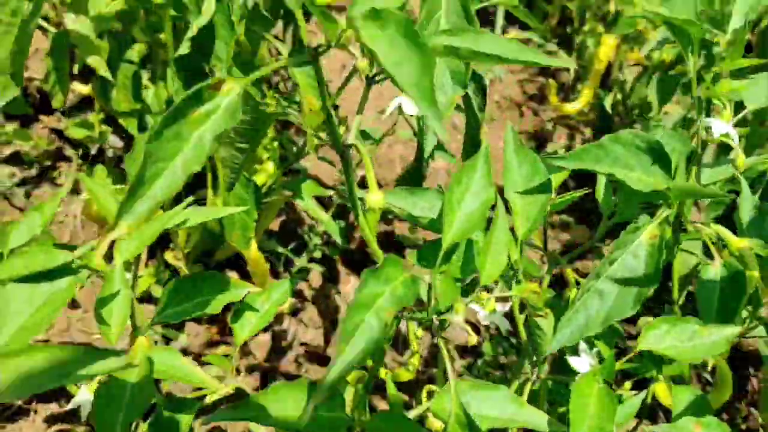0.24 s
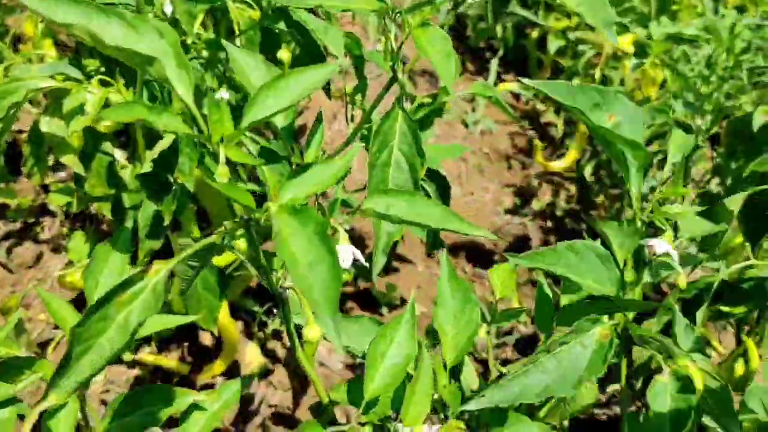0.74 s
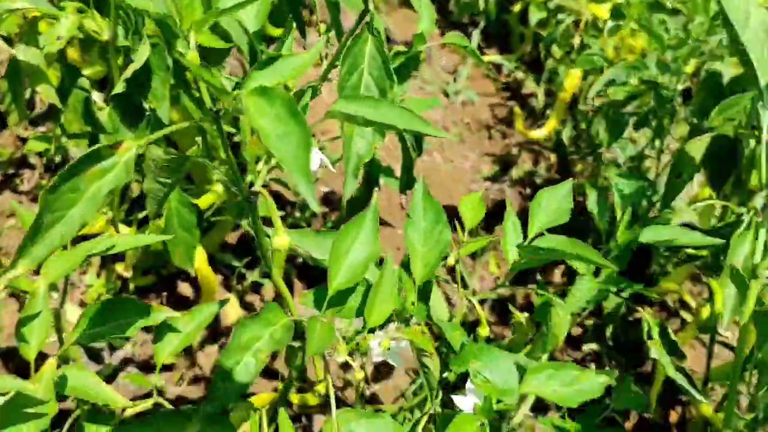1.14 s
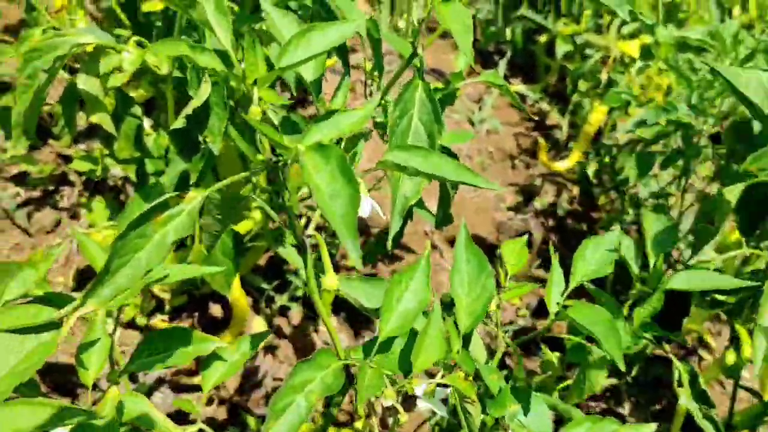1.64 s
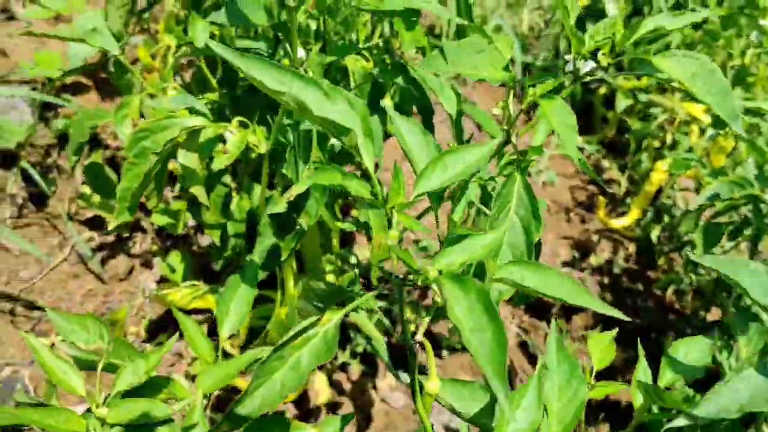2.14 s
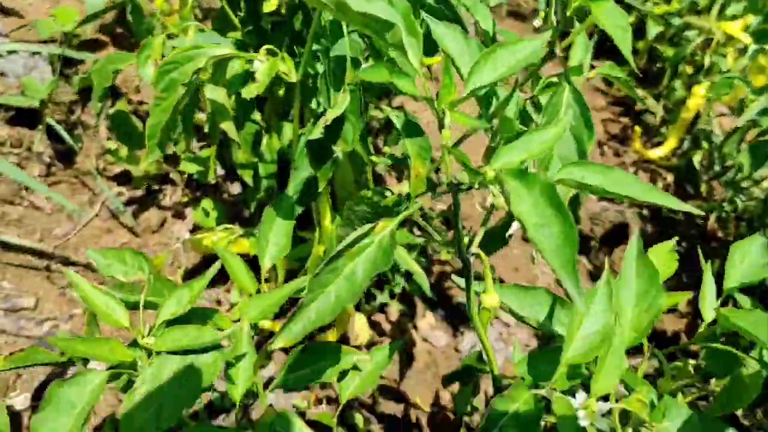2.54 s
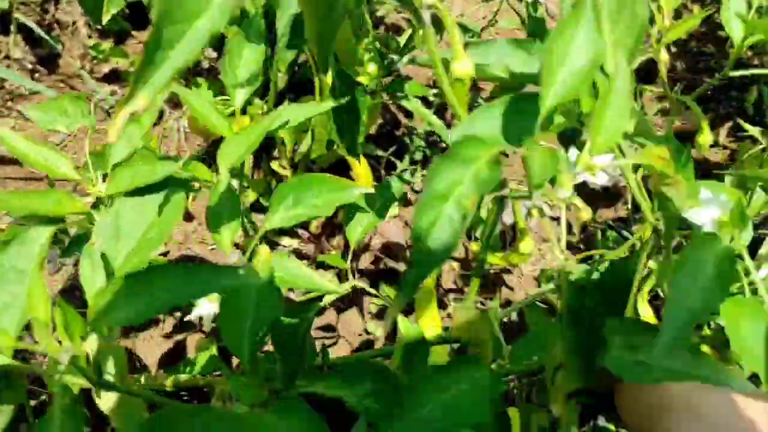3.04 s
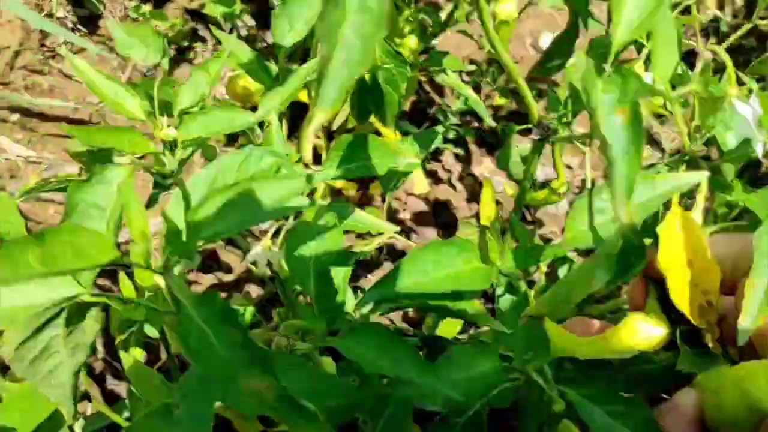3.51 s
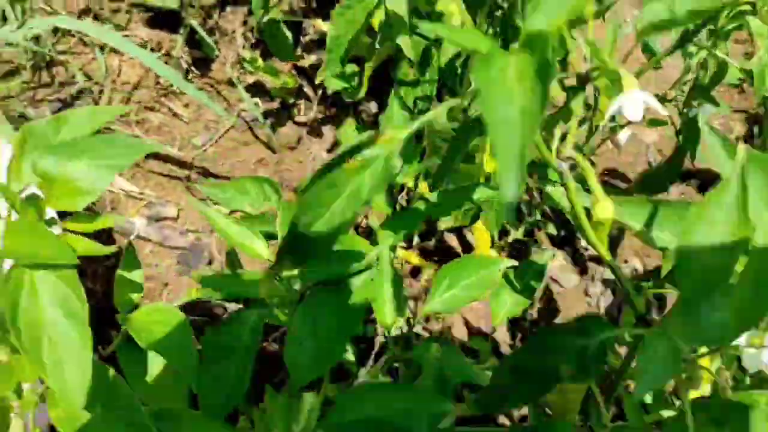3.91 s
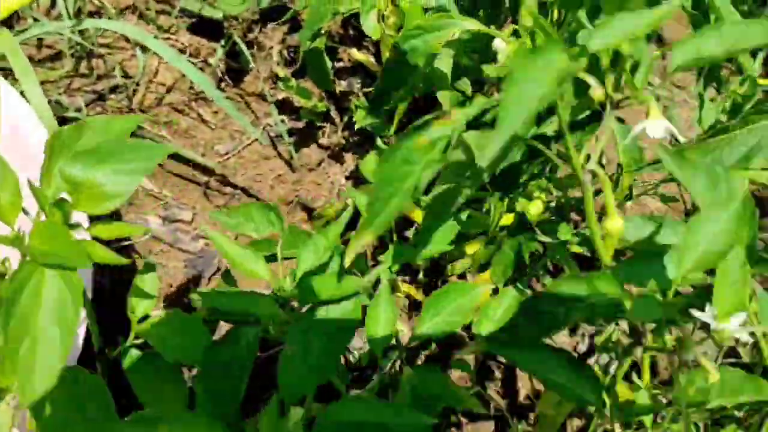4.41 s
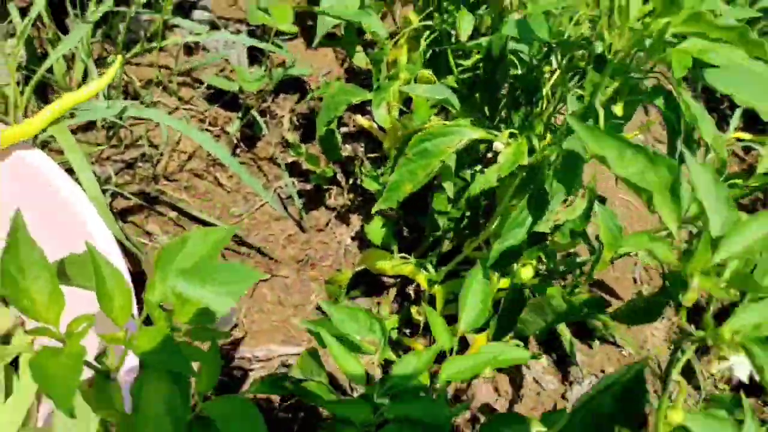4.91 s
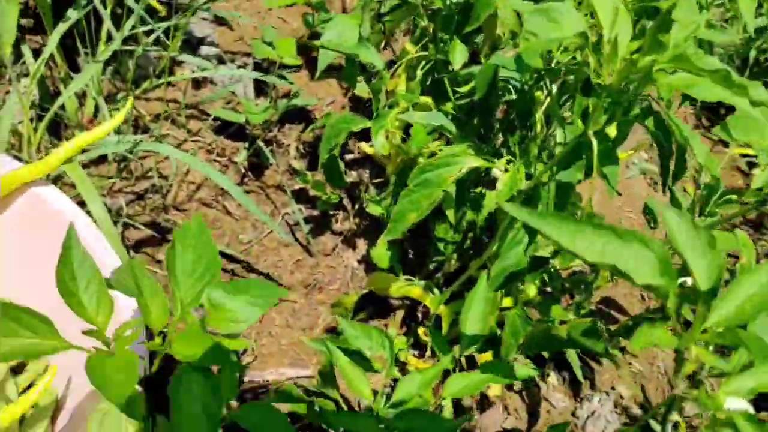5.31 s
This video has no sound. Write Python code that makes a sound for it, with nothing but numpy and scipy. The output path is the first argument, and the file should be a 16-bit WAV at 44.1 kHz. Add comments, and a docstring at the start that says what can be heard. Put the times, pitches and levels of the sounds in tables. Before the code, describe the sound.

Someone walks closer through leafy pepper plants: dull earthy steps, rustling foliage, sharp little twig snaps, then a light rattling knock.

```python
"""Footsteps among pepper plants

Eight footsteps on dry garden soil come closer: dull heel thud, rolling sole, crunch of crumbs.
Leaves brush the legs, cloth shuffles, stalks snap; a light knock follows the last step. Faint air, far hum.
Thuds, stalks and knock are swept or struck resonances; crumbs and leaves are random grains and pings;
the softer layers are shaped noise. Two microphone ports hear it all.
"""
import sys
import numpy as np
from scipy import signal
from scipy.fft import rfft, irfft, next_fast_len
from scipy.io import wavfile

SR = 44100
rng = np.random.default_rng(int(sys.argv[2]) if len(sys.argv) > 2 else 0)


def wav_out(sig):
    """Save sig, one row per channel (or a flat mono array), as 16-bit PCM at SR to the path in sys.argv[1]."""
    wavfile.write(sys.argv[1], SR, np.round(np.clip(np.atleast_2d(sig).T, -1, 1) * 32767).astype(np.int16))


N = 245195
TIME = np.arange(N) / SR

# All levels are relative. left-right/dB > 0: louder on the left.
# outdoor air spectrum [f/Hz, level/dB per Hz]
AIR_SPECTRUM = [(20, -2.5), (48, -1), (80, -7.5), (150, -12.5), (340, -13), (520, -18.5), (800, -14),
                (1500, -21.5), (4000, -20), (8000, -25), (15000, -50)]
# trouser cloth as the legs swing [t/s, level/dB]
CLOTH_LEVEL = [(0, -71), (.04, -64.5), (.2, -69.5), (.4, -82), (.9, -76), (1.3, -60), (1.55, -68.5),
               (1.9, -65.5), (2.15, -68), (2.45, -66), (2.7, -69.5), (3.1, -64.5), (3.7, -65), (4.2, -80),
               (4.75, -67), (5.0, -71), (5.4, -70.5), (5.55, -65)]
# cloth spectrum [f/Hz, level/dB per Hz]
CLOTH_SPECTRUM = [(50, -7), (110, -1), (190, 1.5), (280, -4.5), (390, -2.5), (540, -15), (900, -15.5),
                  (2000, -27), (5000, -46)]
# stirring foliage [t/s, level/dB]
FOLIAGE_LEVEL = [(0, -63), (.4, -66), (.56, -66.5), (.8, -65.5), (1.5, -64), (1.9, -67.5), (2.4, -67),
                 (3.0, -56), (3.6, -71), (3.86, -60.5), (4.15, -57), (4.36, -73), (4.9, -61), (5.1, -72.5),
                 (5.4, -71), (5.55, -67)]
FOLIAGE_PAN_DB = -2
# plants sweeping along the leg [loudest t/s, level/dB, build-up/s, settling/s, left-right/dB]
PLANT_SWEEPS = [(.225, -55.5, 0.05, 0.095, -5), (.955, -58, 0.057, 0.19, -3.5),
                (1.11, -57.5, 0.072, 0.15, 1), (1.96, -48.5, 0.0091, 0.073, 0),
                (2.13, -55, 0.057, 0.13, -3.5), (2.495, -59, 0.021, 0.022, -15),
                (2.608, -52, 0.12, 0.1, -3), (3.195, -53, 0.099, 0.11, -2), (3.425, -49, 0.1, 0.3, -4),
                (3.735, -54, 0.028, 0.087, -1.5), (4.01, -62, 0.0204, 0.069, 8),
                (4.25, -55.5, 0.017, 0.063, -4.5), (4.475, -45.5, 0.064, 0.044, -2.5),
                (4.576, -47.5, 0.043, 0.093, -5.5), (4.785, -52, 0.1, 0.03, -3),
                (5.23, -60.5, 0.063, 0.16, -4), (5.55, -55.5, 0.065, 0.045, -2)]
# leaf rustle spectrum [f/Hz, level/dB per Hz]
LEAF_SPECTRUM = [(200, 7.5), (700, -1.5), (1450, 0), (2400, 4), (5000, -0.5), (7500, 3), (10000, -6),
                 (13500, -2), (16000, -14)]
# leaf edges scraping past [t/s, length/s, level/dB, left-right/dB]
LEAF_SCRAPES = [(1.164, 0.014, -59.5, -19), (1.946, 0.055, -61.5, -9), (2.597, .03, -59.5, -4),
                (3.172, 0.029, -57, 0), (3.359, 0.022, -53, -11), (3.412, 0.058, -54, -5),
                (3.7, 0.056, -61.5, -5), (4.433, 0.022, -54, -2), (4.565, 0.031, -53, -3)]
# light knock, touch by touch [t/s, tick level/dB, hollow body level/dB]
KNOCK_TOUCHES = [(5.2811, -41, -66), (5.2856, -58, -58), (5.2898, -56, -47.5), (5.3062, -49, -44),
                 (5.326, -56, -70), (5.3316, -52.5, -49.5)]
# hard shell of the knocked thing [f/Hz, level/dB, t60/s]
SHELL_MODES = [(1410, -4, .012), (1720, -1.5, 0.016), (2500, -5.5, .022), (2810, -4, .018),
               (3840, -9, .025), (4350, -7, .02)]
# its hollow body [f/Hz, level/dB, t60/s]
BODY_MODES = [(390, 1, 0.037), (506, -3, 0.038), (830, -4, .025)]
# scuff of each touch [f/Hz, level/dB per Hz]
SCUFF_SPECTRUM = [(200, -32), (800, -4), (1300, -1), (1700, -4), (2400, 0), (3300, -6.5), (5500, -11),
                  (15000, -18)]
# stalks and dry leaves snapping [t/s, level/dB, left-right/dB, woody body level/dB, tear build-up/s]
SNAPS = [(0.238, -34.5, -18, -21, 0.0011), (1.061, -29.5, -13.5, -15, 0.0013),
         (1.591, -45.5, -7, -2.5, 0.00174), (1.9367, 0, -7.5, -19, 0.00082), (1.939, -8, -1, -16.5, 0.0013),
         (1.969, -25.5, -14, -26, 0.0014), (2.1347, -29.5, -6, -16, 0.0011),
         (2.567, -29.5, -9, -15, 0.0016), (2.614, -35, -12, -6.5, 0.0014), (2.737, -29, -3, -28, 0.0014),
         (3.196, -20, -6.5, -37, 0.002), (3.2849, -12, -7.5, -45, 0.001), (3.3228, -22, 5, -22, 0.001),
         (3.3487, -12, -6, -16.5, 0.0011), (3.351, -17.5, -5, -12, 0.0011),
         (3.374, -18.5, -13, -24, 0.00095), (3.3804, -24, -17, -19, 0.0013),
         (3.583, -35.5, -12, -25, 0.0011), (3.7368, -26.5, -8, -35, 0.0026),
         (3.84, -31.5, -16.5, -7.5, 0.00086), (3.8893, -21.5, 13, -24, 0.0011),
         (4.341, -23, -13.5, -41, 0.00096), (4.345, -29, -18, -26, 0.00076),
         (4.3751, -12, -15, -37, 0.00088), (4.433, -33, 0, -35, 0.001), (4.463, -32, 8, -16, 0.001),
         (4.566, -21, -3, -40, 0.0013), (4.588, -31, -5, -35, 0.0013), (4.5965, -31, -8, -37, 0.001),
         (4.681, -40.5, -10, 3, 0.00144), (5.545, -30.5, -12, -24, 0.0015)]
BRITTLE_S = 0.00095  # slower tears start with a weaker crack
# cracking fibre [f/Hz, level/dB, t60/s]
FIBRE_MODES = [(6940, 4, 0.0019), (8660, 4.5, 0.00035), (13100, -15.5, 0.012), (14600, -10.5, 0.0026)]
# tearing fibres [f/Hz, level/dB per Hz]
TEAR_SPECTRUM = [(1000, -7), (3500, 2), (5000, -5.5), (6500, 5.5), (8000, 8), (10000, 12), (15000, -21)]
# stalk ringing after a snap [f/Hz, level/dB, t60/s]
STALK_MODES = [(540, -16.5, 0.012), (910, -22, 0.027), (1600, -15.5, 0.018), (2246, -9, 0.011),
               (2635, -9.5, 0.0083), (3217, -16, 0.024), (5280, -14, 0.016)]
# clods giving way as the foot comes to a stand [t/s, level/dB]
CLODS = [(4.441, -61), (4.555, -57.5), (4.576, -51.5), (4.635, -54), (4.669, -58.5)]
# clod spectrum [f/Hz, level/dB per Hz]
CLOD_SPECTRUM = [(80, -11), (200, -12), (360, 4.5), (520, -11), (800, -1), (1200, -18), (2500, -13),
                 (6000, -29)]
# footsteps [t/s, thud level/dB, crunch level/dB, crunch left-right/dB, toe share of crunch/dB,
#   thud shares/dB: heel, heel knock, sole, deep, ground ring;
#   heel to ring/s, ring hold/s, ring release/s, ring f/Hz, ring sag/(Hz/s) (< 0 rises), ring judder (0-1)]
STEPS = [(0.6111, -39, -58.5, -1, -10.5, -1.5, -6.5, -6, 1, -10.5, 0.029, 0.026, 0.029, 221.4, -67, 0.14),
         (1.138, -38, -54, -2, -4.5, -18, -10, 4.5, 4, -6, 0.042, 0.07, 0.0072, 227, 0, .1),
         (1.6744, -33, -49.5, 0.5, -6, -1, -8, -7, 3, -7.5, .022, 0.027, 0.025, 230.7, 105, 0.22),
         (2.213, -29, -48, 1, -9.5, -11, -6.5, -5.5, 3, -7.5, 0.019, 0.039, 0.031, 232.3, 65, 0.23),
         (2.762, -34.5, -46.5, -0.5, -9.5, 0, 0, 1, 3, -6.5, 0.022, 0.022, 0.027, 242, 300, 0.13),
         (3.3213, -30, -48.5, 3.5, -16, 3.5, -2, -5, 0.5, -4.5, 0.023, 0.027, 0.014, 239, 200, 0.11),
         (3.8884, -24, -46.5, -0.5, -8, 0, -12, -6.5, -3, -12, .022, 0.021, 0.024, 237.4, 408, 0.18),
         (4.461, -21.5, -45, 1, -8.5, 1, 1.5, -4, -11, -14.5, 0.029, 0.011, 0.038, 244.5, 200, .1)]
# crumbs breaking [f/Hz, level/dB per Hz]
CRUMB_SPECTRUM = [(200, -5), (600, 9), (1200, 2), (2200, 1), (4000, -0.5), (6000, 0.5), (9000, 1.5),
                  (15000, -29)]
# crumbs: heel presses, holds, lets go; toe pushes off; loose crumbs trickle on
HEEL_ATTACK_S, HEEL_HOLD_S, HEEL_RELEASE_S = 0.00069, 0.029, 0.035
TOE_AFTER_S, TOE_WIDTH_S = 0.12, 0.036
TRICKLE_DB, TRICKLE_S = -14.5, 0.29
# heel on packed soil [f/Hz, level/dB, t60/s]
HEEL_KNOCK_MODES = [(368, -1.5, 0.15), (488, -2, 0.063), (579, -3, 0.031), (608, 8, 0.025),
                    (674, -7, 0.076)]
# rolling sole bumping on lumps [t/s, level/dB, f/Hz]
SOLE_BUMPS = [(0.6079, -42, 210), (0.627, -41, 230), (1.1542, -41, 201), (1.1685, -30.5, 103),
              (1.690, -28.5, 160), (2.2299, -35, 210), (2.780, -31, 261), (3.928, -40, 190),
              (4.497, -33, 200)]
# weaker ground modes around the main ring [f/Hz, level/dB, t60/s]
GROUND_MODES = [(129, -7.5, 0.12), (182.6, -17.5, 0.23), (308, -23.5, 0.52), (376, -15, 0.066),
                (644, -38, .10)]
# sole pressing into soil [f/Hz, level/dB per Hz]
SOLE_SPECTRUM = [(40, -33.5), (120, -2), (240, -1.5), (370, -2), (470, -14.5), (650, -39), (950, -27),
                 (2000, -51)]
# body weight shaking the deeper ground [f/Hz, level/dB per Hz]
DEEP_SPECTRUM = [(20, -26.5), (55, -12), (120, -3), (160, -4), (230, -11.5), (500, -36.5)]
# microphone ports, each with its own treble resonance [f/Hz, left level/dB, right level/dB]
PORTS = [(60, 5, -0.5), (450, 3, -2), (1150, 4.5, 0.5), (2530, -3.5, 0.5), (4460, -2, 2.5),
         (6700, -3.5, 7.5), (7350, 3.5, 11), (8000, -2, 8.5), (8540, 11, -0.5), (9490, 4, -15.5),
         (10470, -14.5, -13), (12600, -4, -9.5), (15100, -13, -11.5), (16400, -14, -13.5)]
PORT_LAG_S, BASS_LAG_S = 0.00032, 0.00036
CUTOFF_HZ = 16400


def from_db(db):
    """Decibels to gain."""
    return 10 ** (np.asarray(db) / 20)


def rms_one(x):
    """Scale to an rms of 1."""
    return x / np.sqrt(np.mean(x ** 2) + 1e-20)


def butter(x, order, edge_hz, kind="low"):
    """Butterworth low-pass or high-pass."""
    return signal.sosfilt(signal.butter(order, edge_hz, kind, fs=SR, output="sos"), x)


def soften(x, edge_hz):
    """A soft contact carries little treble: low-pass."""
    return butter(x, 2, edge_hz)


def colour(x, spectrum):
    """Causal minimum-phase filter through (f/Hz, level/dB) points, by folding the cepstrum."""
    size = next_fast_len(N + SR // 10, True)
    size += size % 2
    hz, db = np.transpose(spectrum)
    grid_hz = np.maximum(np.arange(size // 2 + 1) * SR / size, 1)
    gain = from_db(np.interp(np.log(grid_hz), np.log(hz), db))
    cepstrum = irfft(np.log(gain))
    cepstrum[1:size // 2] *= 2
    cepstrum[size // 2 + 1:] = 0
    response = np.exp(rfft(cepstrum))
    return irfft(rfft(x, size) * response)[..., :N]


def coloured_noise(spectrum):
    """Shaped noise with an rms of 1."""
    return rms_one(colour(rng.standard_normal(N), spectrum))


def drift(per_s):
    """Slow random curve, rms 1, with per_s knots a second."""
    knots = rng.standard_normal(4096)
    return rms_one(np.interp(TIME * per_s, np.arange(len(knots)), knots))


def panned(x, pan_db):
    """Make the left channel pan_db louder than the right."""
    return x * from_db([[pan_db / 2], [-pan_db / 2]])


def from_right(x, lag_s=PORT_LAG_S):
    """A sound from the right reaches the left port later."""
    return np.array([np.interp(TIME - lag_s, TIME, x), x])


def clicks(times, heights):
    """One click of the given height at each time."""
    out = np.zeros(N)
    out[np.clip(np.round(times * SR).astype(int), 0, N - 1)] = heights
    return out


def ring(push, hz, t60):
    """Two-pole resonator: a unit click sets a decaying sine of height 1 ringing."""
    r = np.exp(-np.log(1000) / (t60 * SR))
    w = 2 * np.pi * hz / SR
    return signal.lfilter([0, np.sin(w)], [1, -2 * r * np.cos(w), r * r], push + 1e-18)


def struck(modes, times, level_db, vary_db):
    """Each blow rings each mode with its own strength; neighbouring modes start in opposite directions."""
    out = np.zeros(N)
    for k, (hz, db, t60) in enumerate(modes):
        blow_db = level_db + db + vary_db * rng.standard_normal(len(times))
        out += (-1) ** k * ring(clicks(times, from_db(blow_db)), hz, t60)
    return out


def swell(start, rise_s):
    """Envelope that reaches 1 after rise_s and dies away."""
    age = np.maximum(TIME - start, 0) / rise_s
    return age * np.exp(1 - np.minimum(age, 50))


def bursts(spectrum, times, level_db, rise_s):
    """Countless tiny contacts, as shaped noise that swells and dies away after each time."""
    envelope = sum(from_db(db) * swell(t, rise) for t, db, rise in np.broadcast(times, level_db, rise_s))
    return envelope * coloured_noise(spectrum)


def fracture_sizes(spread_db):
    """Uneven sizes with an exponential spread in dB."""
    return from_db(spread_db * np.minimum(rng.exponential(1, N), 4))


def grains(per_s, spread_db, clump_db, alike_below_hz):
    """Tiny fractures in clumps; lows reach both ports alike but for a lag, highs differ."""
    sizes = fracture_sizes(spread_db) * from_db(clump_db * drift(140))
    pops = (rng.random(N) < per_s / SR) * sizes * rng.standard_normal((3, N))
    lows = from_right(soften(pops[0] + 1e-18, alike_below_hz))
    highs = butter(pops[1:] + 1e-18, 2, alike_below_hz, "high")
    return rms_one(lows + highs)


def pings(per_s, low_hz, high_hz, cycles, spread_db, count=20):
    """Random tiny fractures, each ringing at one of count pitches, down 60 dB after the given cycles."""
    sizes = fracture_sizes(spread_db) * rng.choice([-1, 1], N)
    pops = sizes * (rng.random(N) < per_s / SR)
    pitch = rng.integers(0, count, N)
    out = np.zeros(N)
    for k, hz in enumerate(np.geomspace(low_hz, high_hz, count)):
        out += ring(pops * (pitch == k), hz, cycles / hz) * np.sqrt(hz)
    return rms_one(out)


def air(level_db=-65.0, alike_below_hz=650, waver_db=0.53):
    """Distant outdoor rumble, alike at both ports in the bass, under a thin unrelated hiss."""
    low = butter(rng.standard_normal(N), 1, alike_below_hz)
    high = butter(rng.standard_normal((2, N)), 1, alike_below_hz, "high")
    return from_db(level_db + waver_db * drift(9.9)) * rms_one(colour(low + high, AIR_SPECTRUM))


def hum(hz=68.4, level_db=-63, wander_hz=1.64, waver_db=2.0):
    """A far motor: one sine, wavering a little in pitch and level."""
    turns = np.cumsum(hz + wander_hz * drift(5.3)) / SR
    return from_db(level_db + waver_db * drift(8.2)) * np.sin(2 * np.pi * turns)


def cloth(flap_db=0.5):
    """Loose trouser cloth: dull, uneven shuffle of shaped noise."""
    level_db = np.interp(TIME, *np.transpose(CLOTH_LEVEL)) + flap_db * drift(22)
    return from_right(from_db(level_db) * coloured_noise(CLOTH_SPECTRUM), BASS_LAG_S)


def crackle():
    """Bright ticks of leaf veins catching on cloth, different at each port."""
    return np.array([pings(per_s=600, low_hz=6400, high_hz=9400, cycles=30, spread_db=2.5)
                     for port in range(2)])


def sweep(peak_s, build_s, settle_s):
    """Envelope of a plant brushed by the leg: grows to 1 at peak_s, then settles."""
    distance = np.maximum((peak_s - TIME) / build_s, (TIME - peak_s) / settle_s)
    return np.exp(-np.minimum(distance, 20))


def leaves(level_db=-5.0, crackle_db=-11, catch_db=-13):
    """Leaves slide over cloth: hiss of grains, crackle and lone catches swell with each plant passed."""
    stirring = from_db(np.interp(TIME, *np.transpose(FOLIAGE_LEVEL)))
    power = panned(stirring, FOLIAGE_PAN_DB) ** 2
    for s, db, build_s, settle_s, pan_db in PLANT_SWEEPS:
        power = power + panned(from_db(db) * sweep(s, build_s, settle_s), pan_db) ** 2
    hiss = grains(per_s=8000, spread_db=1.0, clump_db=2.0, alike_below_hz=820)
    rustle = rms_one(colour(hiss, LEAF_SPECTRUM))
    catches = from_right(pings(per_s=110, low_hz=2200, high_hz=8800, cycles=26, spread_db=2.5))
    mix = from_db(level_db) * rustle + from_db(crackle_db) * crackle() + from_db(catch_db) * catches
    flutter = from_db(1.3 * drift(28))
    return np.sqrt(power) * flutter * mix


def scrapes(edge_s=0.0022):
    """A leaf edge catches, crackles along the cloth and slips off."""
    grip = 0
    for s, length_s, db, pan_db in LEAF_SCRAPES:
        inside_s = np.minimum(TIME - s, s + length_s - TIME)
        grip = grip + panned(from_db(db) * np.clip(inside_s / edge_s + .5, 0, 1), pan_db)
    return grip * crackle()


def knock(scuff_db=-8, body_after_s=0.0012, pan_db=-5):
    """A light thing is bumped and rattles to rest: each touch scuffs, rings the shell, then the hollow body."""
    s, tick_db, body_db = np.transpose(KNOCK_TOUCHES)
    shell = struck(SHELL_MODES, s, tick_db, vary_db=1.5)
    scuff = bursts(SCUFF_SPECTRUM, s, tick_db + scuff_db, rise_s=0.0018)
    body = struck(BODY_MODES, s + body_after_s, body_db, vary_db=0.5)
    return panned(from_right(shell + scuff + body), pan_db)


def snaps(crack_db=-11, stalk_db=-4, tear_db=-25, flutter_db=-50, flutter_s=0.0057):
    """A fibre cracks, its neighbours tear for milliseconds, the stalk rings and the leaf flutters."""
    s, snap_db, pan_db, body_db, tear_s = np.transpose(SNAPS)
    tear_s = np.maximum(tear_s, 3e-4)
    sharp_db = 20 * np.log10(np.minimum(BRITTLE_S / tear_s, 1))
    out = []
    for side in (1, -1):
        level_db = snap_db + side * pan_db / 2
        crack = struck(FIBRE_MODES, s, level_db + crack_db + sharp_db, vary_db=1.5)
        tearing = bursts(TEAR_SPECTRUM, s, level_db + tear_db, tear_s)
        flutter = bursts(TEAR_SPECTRUM, s, level_db + flutter_db, flutter_s)
        stalk = struck(STALK_MODES, s + tear_s, level_db + body_db + stalk_db, vary_db=2.0)
        out.append(crack + tearing + flutter + stalk)
    return np.array(out)


def clods(rise_s=0.012):
    """Lumps of earth collapse with short dull puffs of noise."""
    s, level_db = np.transpose(CLODS)
    return from_right(bursts(CLOD_SPECTRUM, s, level_db, rise_s))


def first_touch(share_db=-2, rise_s=0.00089, after_s=0.0016):
    """The heel edge scrapes the crust in one crisp instant as it lands."""
    s, _, crunch_db, *_ = np.transpose(STEPS)
    return from_right(bursts(CRUMB_SPECTRUM, s + after_s, crunch_db + share_db, rise_s))


def pressure(age, toe_db):
    """How hard a foot works the crumbs, age seconds after the heel lands."""
    landed = np.clip(1 + age / HEEL_ATTACK_S, 0, 1)
    heel = np.exp(-np.maximum(age - HEEL_HOLD_S, 0) / HEEL_RELEASE_S)
    toe = from_db(toe_db) * np.exp(-.5 * ((age - TOE_AFTER_S) / TOE_WIDTH_S) ** 2)
    trickle = from_db(TRICKLE_DB) * np.exp(-(age / TRICKLE_S) ** 2)
    return landed * np.sqrt(heel ** 2 + toe ** 2 + trickle ** 2)


def crunch(level_db=-0.5, grit_db=-12):
    """Dry crumbs break under the heel, then again as weight moves forward; coarser grit clicks among them."""
    s, _, crunch_db, pan_db, toe_db, *_ = np.transpose(STEPS)
    load = sum(panned(from_db(db) * pressure(TIME - t, toe), pan)
               for t, db, pan, toe in zip(s, crunch_db, pan_db, toe_db))
    fractures = grains(per_s=5000, spread_db=1.2, clump_db=2.1, alike_below_hz=2100)
    crumbs = rms_one(colour(fractures, CRUMB_SPECTRUM))
    grit = from_right(pings(per_s=260, low_hz=1150, high_hz=5500, cycles=32, spread_db=2.5))
    return load * (from_db(level_db) * crumbs + from_db(grit_db) * grit)


def off_the_legs(x, lag_s=0.0019, sway_s=0.0003, share=.4):
    """A swaying echo off the moving legs gives each step a slightly different hollow colour."""
    late = TIME - lag_s - sway_s * drift(1.8)
    echo = np.array([np.interp(late, TIME, port) for port in x])
    return (x + share * echo) / np.hypot(1, share)


def heel_blow(start, first_hz=385, last_hz=205, give_s=0.0048, peak_s=0.0075):
    """Soft soil gives way under the heel: a blow of a few cycles with falling pitch."""
    age = np.maximum(TIME - start, 0)
    turns = last_hz * age + (first_hz - last_hz) * give_s * (1 - np.exp(-age / give_s))
    return swell(start, peak_s) ** 4 * np.sin(2 * np.pi * turns)


def ground_ring(start, hold_s, release_s, hz, sag_hz_per_s, judder,
                attack_s=0.0038, wobble_hz=4, rough_db=1.0, judder_s=0.042):
    """The loaded ground booms on one gliding low note; at first every other swing is stronger."""
    age = np.clip(TIME - start, 0, .4)
    release = np.exp(-np.maximum(TIME - start - hold_s, 0) / release_s)
    envelope = np.minimum(age / attack_s, 1) * release
    pitch_hz = hz - sag_hz_per_s * age + wobble_hz * drift(60)
    turns = np.cumsum((age > 0) * pitch_hz) / SR
    uneven = 1 + 2 * judder * np.exp(-(age / judder_s) ** 2) * np.cos(np.pi * turns)
    return envelope * uneven * from_db(rough_db * drift(90)) * np.sin(2 * np.pi * turns)


def sole_bumps(cycles=3.6, edge_hz=410):
    """The rolling sole bumps down on lumps: short low resonances."""
    bumps = sum(ring(clicks(np.array([t]), from_db(db)), hz, cycles / hz) for t, db, hz in SOLE_BUMPS)
    return soften(bumps, edge_hz)


def thuds(sink_s=0.00368, knock_db=-12.0, sole_rise_s=0.016, sole_db=-13.0,
          deep_rise_s=0.039, deep_db=-18, high_pass_hz=60):
    """Heel gives a short dull blow, sole rolls over the lumps, forefoot sets the ground ringing."""
    (s, thud_db, _, _, _, heel_db, firm_db, roll_db, weight_db, ring_db,
     forefoot_s, *ring_shape) = np.transpose(STEPS)
    heel = sum(from_db(db) * heel_blow(t) for t, db in zip(s, thud_db + heel_db))
    firm = struck(HEEL_KNOCK_MODES, s + sink_s, thud_db + firm_db + knock_db, vary_db=2.0)
    firm = soften(firm, edge_hz=1060)
    ring_s, ring_level_db = s + forefoot_s, thud_db + ring_db
    boom = sum(from_db(db) * ground_ring(*step) for db, *step in zip(ring_level_db, ring_s, *ring_shape))
    forefoot = soften(struck(GROUND_MODES, ring_s, ring_level_db, vary_db=5.0), edge_hz=630)
    # high-pass keeps the contacts' low thump free of sub-bass
    contacts = butter(heel + firm + sole_bumps() + boom + forefoot, 1, high_pass_hz, "high")
    sole = bursts(SOLE_SPECTRUM, s, thud_db + roll_db + sole_db, sole_rise_s)
    deep = bursts(DEEP_SPECTRUM, s, thud_db + weight_db + deep_db, deep_rise_s)
    return from_right(contacts + sole + deep, BASS_LAG_S)


def scene():
    """The walk through the plants, in the open air."""
    background = air() + hum()
    plants = leaves() + scrapes() + snaps()
    soil = off_the_legs(first_touch() + crunch()) + clods()
    return background + cloth() + plants + knock() + soil + thuds()


def record(dry):
    """Each port colours its channel; a steep low-pass cuts the top."""
    ports = np.array(PORTS)
    left = colour(dry[0], ports[:, [0, 1]])
    right = colour(dry[1], ports[:, [0, 2]])
    low_pass = signal.ellip(10, .1, 80, CUTOFF_HZ, fs=SR, output="sos")
    return signal.sosfilt(low_pass, np.array([left, right]))


dry = scene()
out = record(dry)
wav_out(out)
```